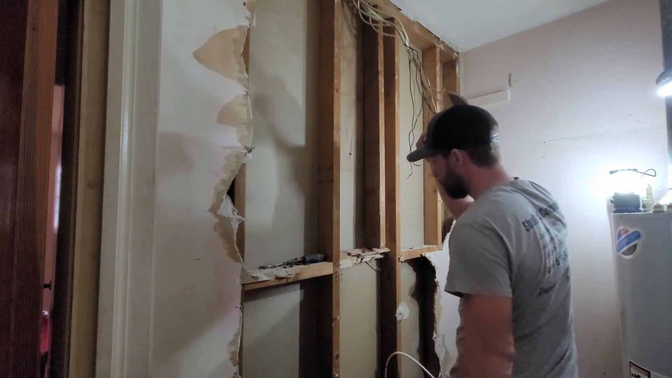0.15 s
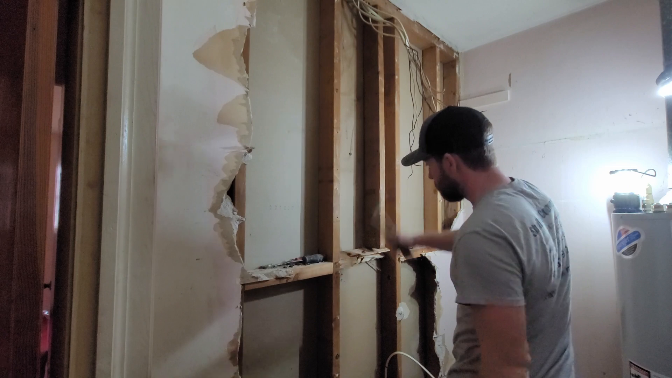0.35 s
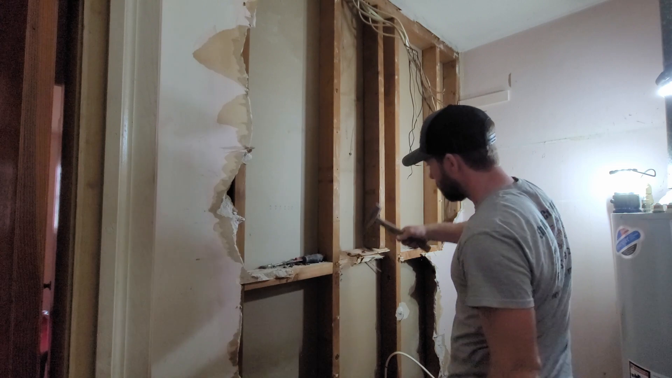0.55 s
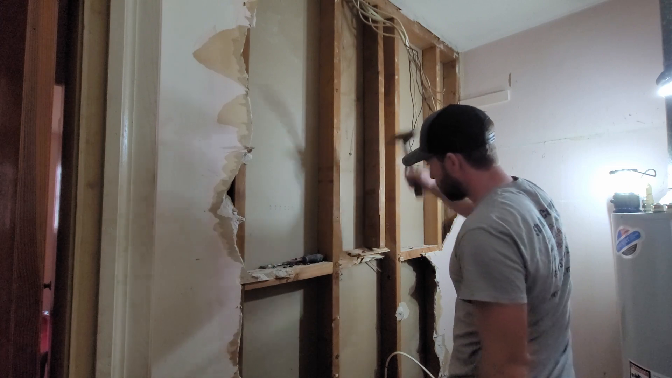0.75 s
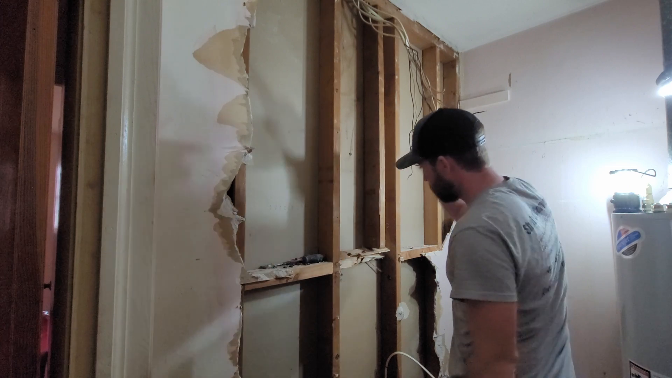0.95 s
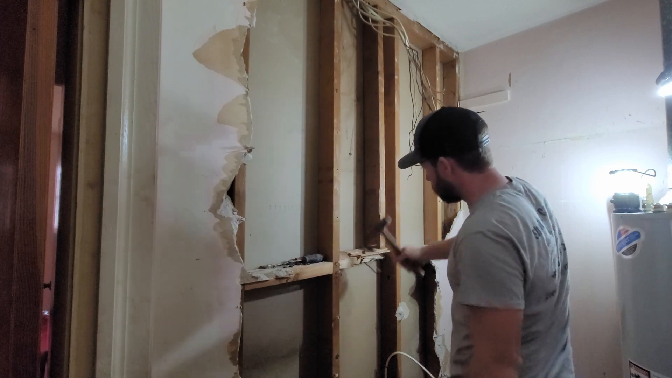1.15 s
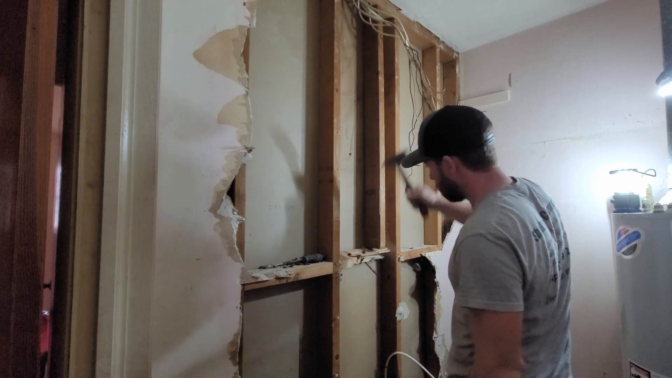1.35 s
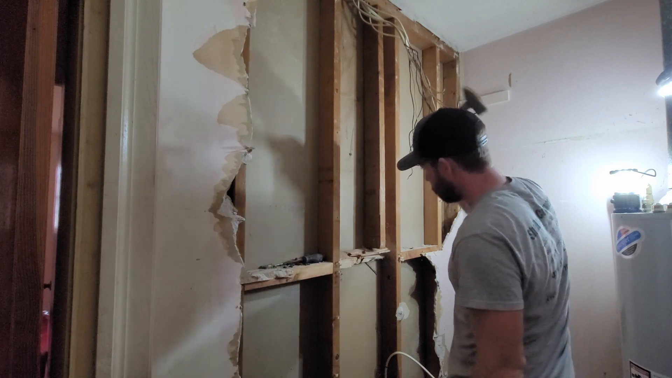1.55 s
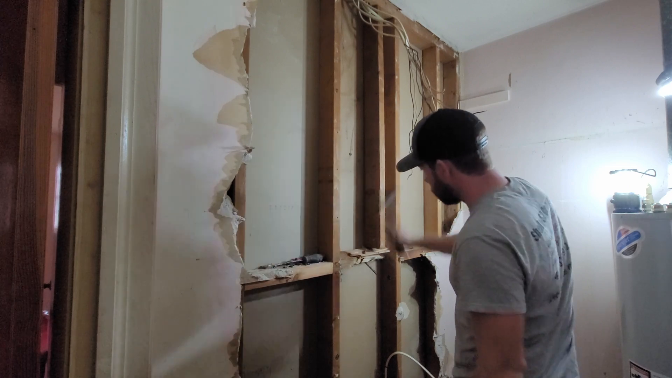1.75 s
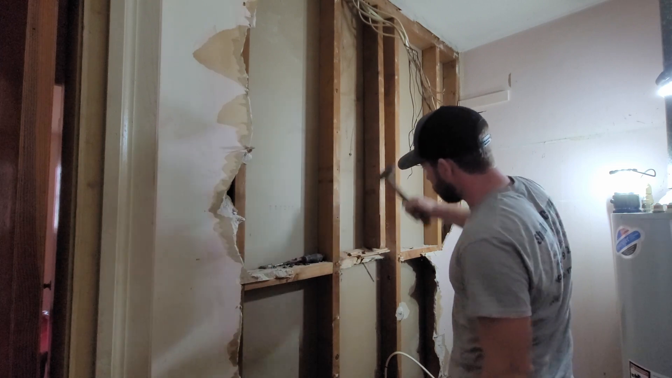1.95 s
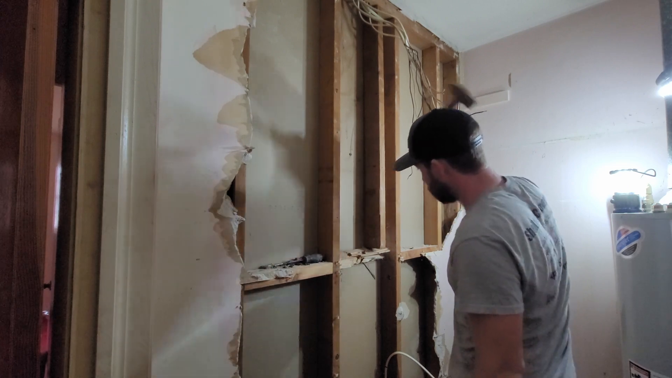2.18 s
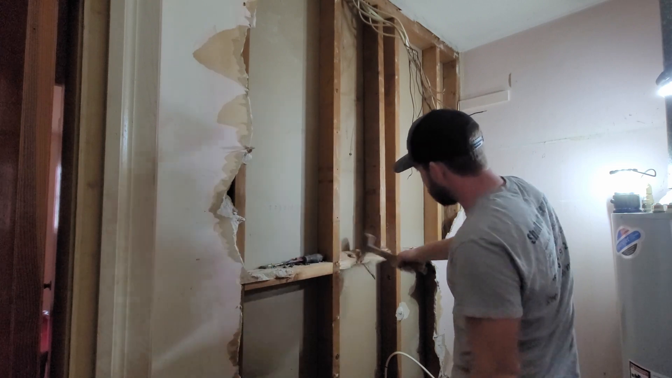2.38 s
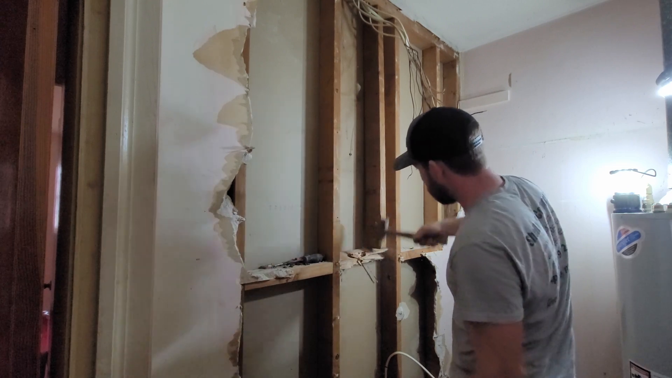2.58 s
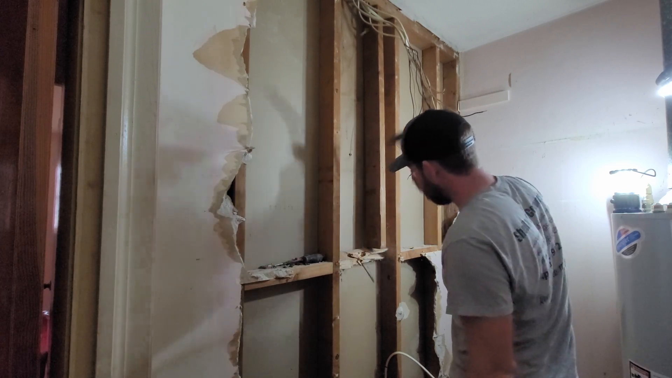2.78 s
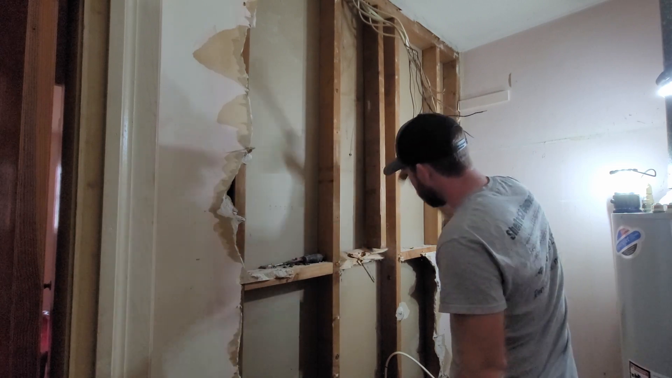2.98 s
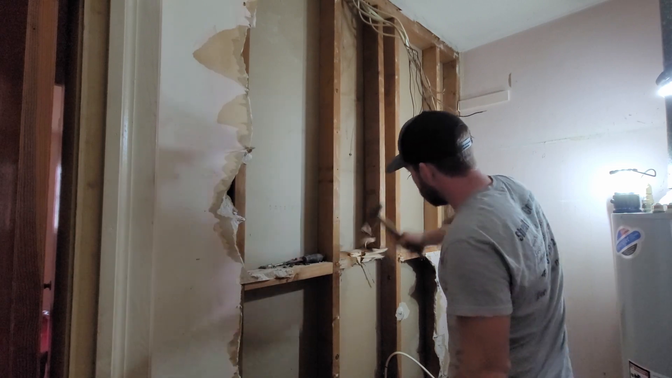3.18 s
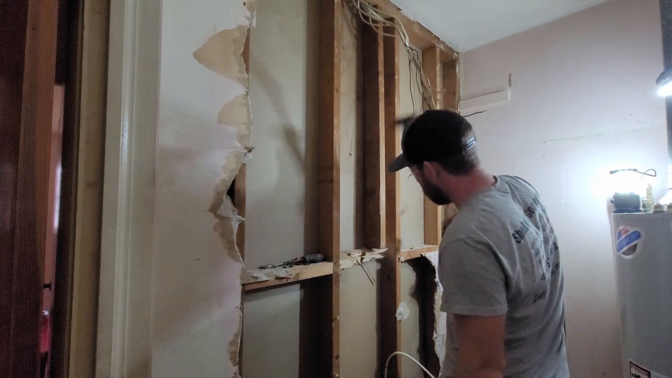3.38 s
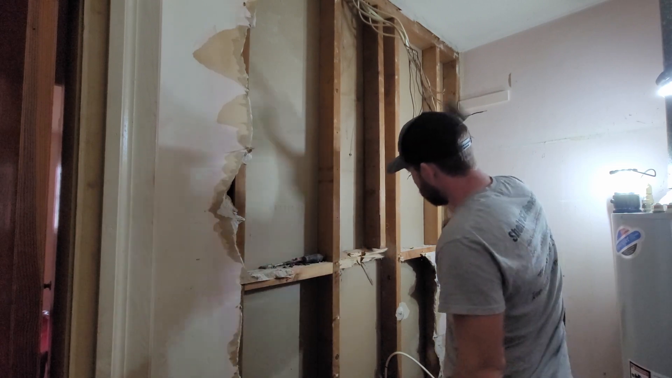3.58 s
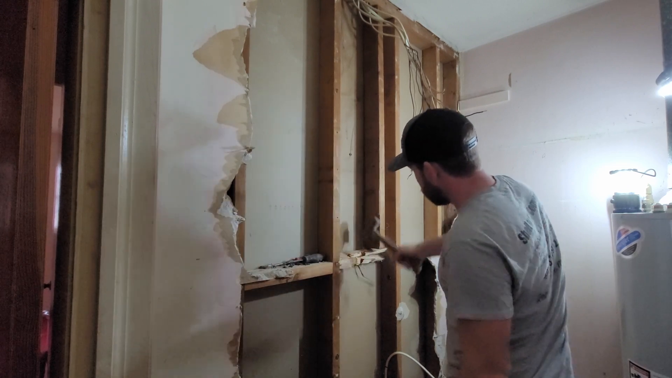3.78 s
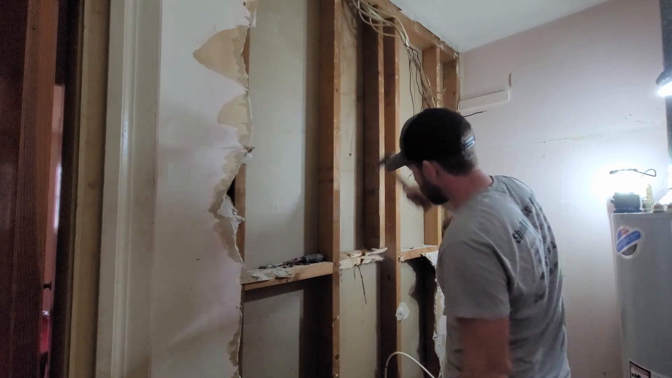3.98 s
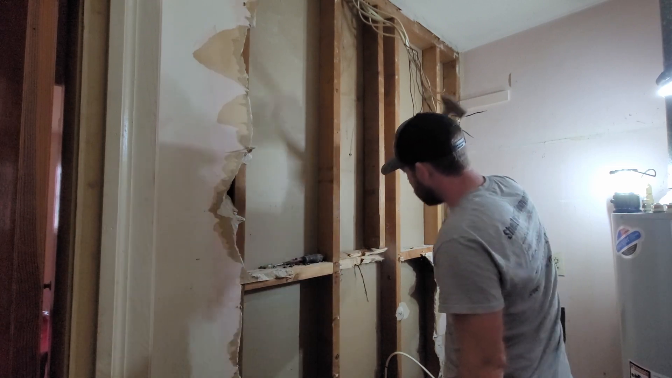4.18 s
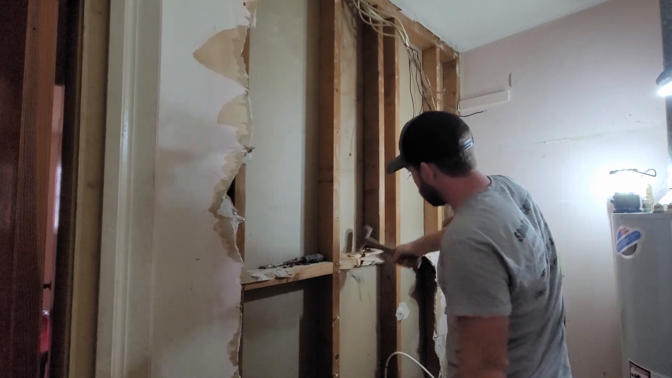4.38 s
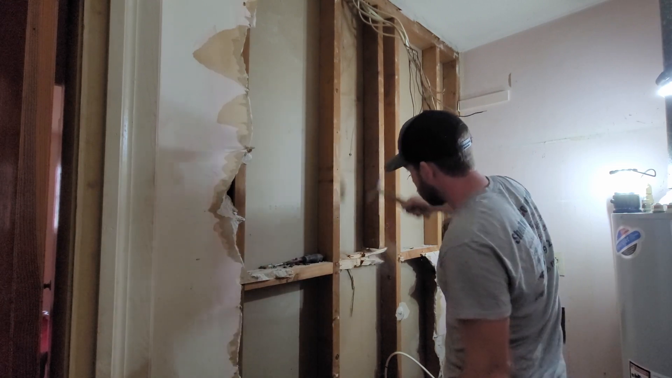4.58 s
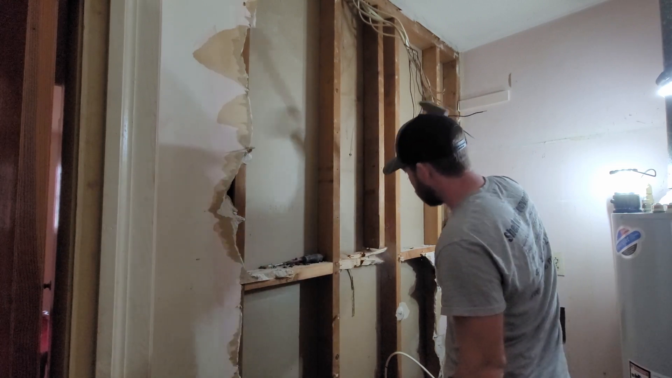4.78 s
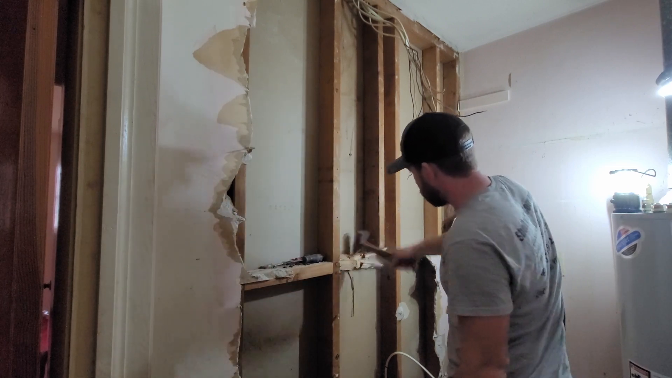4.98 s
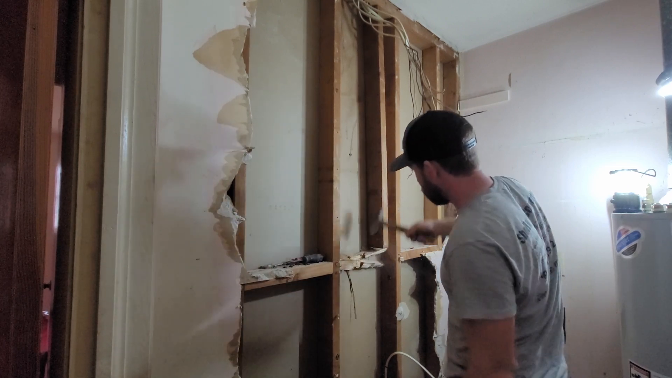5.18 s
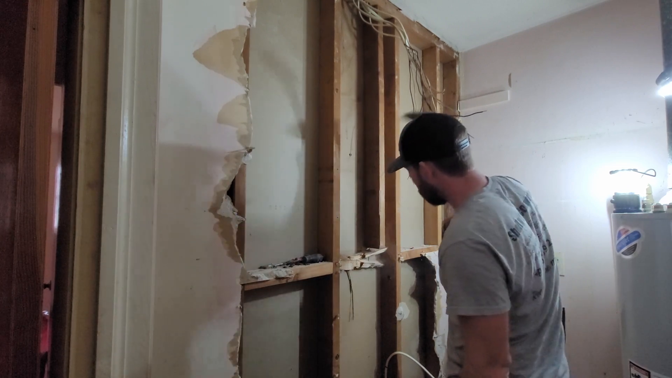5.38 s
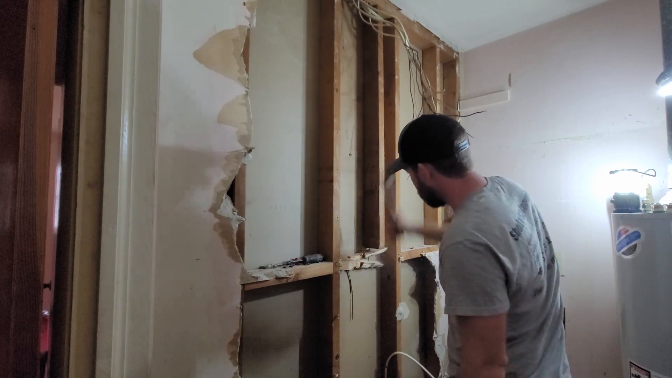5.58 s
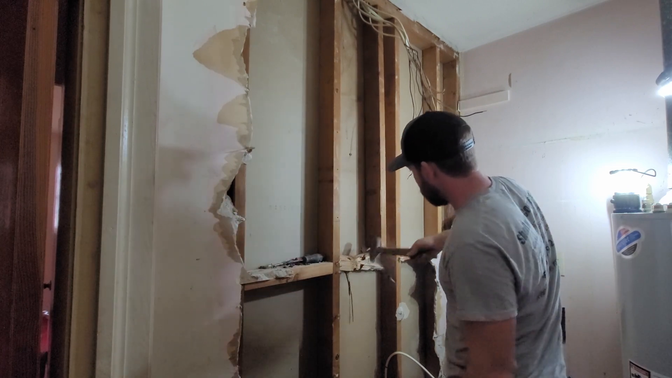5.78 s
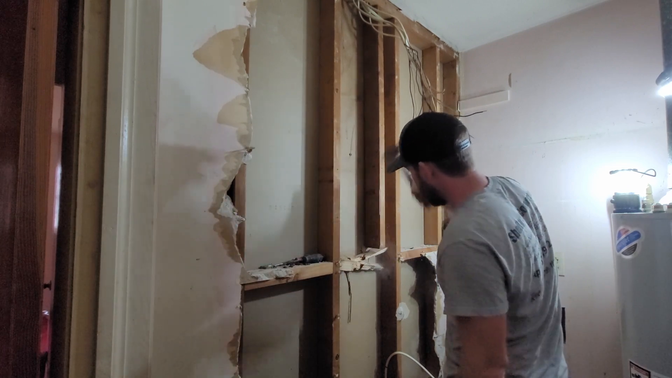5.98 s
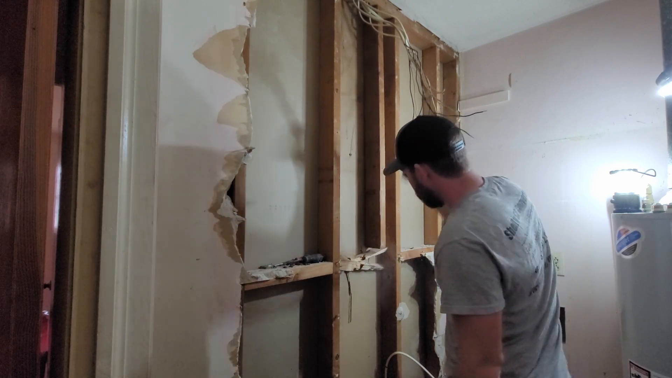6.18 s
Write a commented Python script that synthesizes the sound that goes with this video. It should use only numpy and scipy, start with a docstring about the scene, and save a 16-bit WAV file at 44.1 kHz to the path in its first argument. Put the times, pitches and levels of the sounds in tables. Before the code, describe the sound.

Loud, regular hammer blows land on timber wall framing a few metres from the microphone in an empty room. All nine strikes crack hard, slightly overloaded, each ringing a little differently and leaving a short echo through the house. Around the middle, loose pieces of wood and plaster tick and clack on the floor and a nail bounces. Only a faint rumble and hiss lie underneath.

```python
"""Hammering in a stud wall

A steel hammer strikes a timber cross-piece in an opened wall, a few metres away in a bare room.
Each blow cracks, excites the modes of timber and wall panels, and reverberates through the empty house.
Chips tick on the floor and a nail bounces, over faint rumble and hiss. The blows overload the
microphone input, which flattens the wave ahead of a bass cut and a limiter."""
import sys
import numpy as np
from scipy import signal
from scipy.fft import rfft, irfft
from scipy.io import wavfile
from scipy.ndimage import uniform_filter1d, minimum_filter1d

SR = 44100
rng = np.random.default_rng(int(sys.argv[2]) if len(sys.argv) > 2 else 0)


def wav_record(signal):
    """Record a signal, one row per channel, as 16-bit PCM in the file named by sys.argv[1]."""
    frames = np.transpose(np.atleast_2d(signal))
    bounded = np.clip(frames, -1, 1)
    # unit amplitude maps onto the largest positive 16-bit level
    quanta = np.round(bounded * 32767).astype(np.int16)
    wavfile.write(sys.argv[1], SR, quanta)


N = 275625


def undb(db):
    """Amplitude ratio of a level in decibels."""
    return 10 ** (np.asarray(db) / 20)


def fade(t, t60):
    """Exponential decay, 60 dB down at t60."""
    return np.exp(-np.log(1000) * t / max(t60, 1e-3))


def unit(x):
    """Normalisation to unit energy."""
    return x / np.sqrt(np.sum(x ** 2))


def add(out, start_s, x):
    """Superposition: x joins out from start_s on."""
    i = int(start_s * SR)
    out[i:i + len(x)] += x[:len(out) - i]


def bin_hz(size):
    """FFT bin frequencies, raised 1 Hz to keep their logarithm finite."""
    return np.fft.rfftfreq(size, 1 / SR) + 1


def bell(size, centre_hz, octaves):
    """Gaussian passband in log frequency, as gains on the FFT bins."""
    return np.exp(-.5 * (np.log2(bin_hz(size) / centre_hz) / octaves) ** 2)


def shape(table, size):
    """Spectral envelope: bin gains interpolated from (frequency [Hz], level [dB])."""
    hz, db = np.transpose(table)
    return undb(np.interp(np.log(bin_hz(size)), np.log(hz), db))


def minimum_phase(gain):
    """Folding the cepstrum gives the most compact causal pulse with this magnitude spectrum."""
    cepstrum = irfft(np.log(gain))
    half = len(cepstrum) // 2
    cepstrum[1:half] *= 2
    cepstrum[half + 1:] = 0
    return irfft(np.exp(rfft(cepstrum)))


def ring(modes, seconds, scatter_db, tilt_db=0):
    """Free vibration: damped modes of alternating sign, excited a little differently by each strike."""
    t = np.arange(int(seconds * SR)) / SR
    out = 0
    for k, (hz, db, t60) in enumerate(modes):
        level_db = db + scatter_db * rng.standard_normal() + tilt_db * np.log2(hz / modes[0][0])
        out += (-1) ** k * undb(level_db) * fade(t, t60) * np.sin(2 * np.pi * hz * t)
    return out


def room_responses(count):
    """Coupled spaces: after the direct sound, reverberation dies fast in the room, slowly in the house."""
    # reverberation: (frequency [Hz], room t60 [s], house level [dB], house t60 [s])
    reverberation = [(39, 0.39, -4.5, 3.9), (107.8, 0.21, -22, 1.06), (267, 0.41, -21.5, 1.246),
                     (550, 0.27, -26, 1.21), (1500, 0.25, -24, 1.135), (2500, 0.19, -24, 0.83),
                     (4460, 0.25, -24, 0.86), (6950, 0.19, -22, 0.57), (10200, 0.15, -20.5, .4),
                     (16300, 0.1, -23.5, .25)]
    size, rise_cycles, direct_db = 2 ** 16, 2.2, -12
    t = np.arange(size) / SR
    hz, *columns = np.transpose(reverberation)
    white = rfft(rng.standard_normal((count, size)))
    out = 0
    for centre in 32 * 2 ** (np.arange(28) / 3):  # third-octave bands
        room_t60, house_db, house_t60 = (np.interp(np.log(centre), np.log(hz), c) for c in columns)
        rise = 1 - np.exp(-t * centre / rise_cycles)  # low tones need longer to fill the room
        decay = fade(t, room_t60) + undb(house_db) * fade(t, house_t60)
        out += irfft(white * bell(size, centre, 1 / 7), size) * rise * decay
    out /= np.sqrt(np.sum(out ** 2, axis=1, keepdims=True))
    out[:, 0] += undb(direct_db)
    return out


def still_house():
    """Stationary noise: a faint rumble and hiss."""
    # background spectrum: (frequency [Hz], relative spectral density [dB])
    spectrum = [(18, -43), (30, -1.5), (69, 12.5), (163, -12), (579, -31.5), (1180, -32.5), (4840, -24.5),
                (6760, -32.5), (9000, -42), (11700, -61), (19800, -120)]
    rms_db = -59.5
    noise = irfft(rfft(rng.standard_normal(N)) * shape(spectrum, N), N)
    return undb(rms_db) * noise / np.std(noise)


def tick(db, centre_hz, octaves):
    """A brief impact gives a pulse with one spectral peak on a fainter, broad skirt."""
    peak = bell(1024, centre_hz, octaves)
    skirt = undb(-24) * bell(1024, centre_hz, octaves=1.4)
    return undb(db) * unit(minimum_phase(peak + skirt + 1e-3))


def debris(response):
    """Impacts on the floor: chips tick, a nail ticks and rings; reflections smear both."""
    # falling wood and plaster: (time [s], level [dB], centre [Hz], width [octaves])
    chips = [(0.341, -42.5, 640, 0.35), (.798, -39, 8800, 0.43), (2.725, -36, 13100, .3),
             (2.79, -35, 11000, .15), (2.816, -6.5, 3900, 0.24), (2.875, -32, 7340, 0.41),
             (3.068, -4.5, 1570, 0.87), (3.143, -40, 10000, 0.56), (4.047, -29, 11500, 0.3),
             (4.157, -42, 12000, .3), (4.185, -42, 12500, .3), (4.242, -3.5, 3600, 0.69),
             (4.399, -41, 9800, 0.31)]
    # a pulled nail bouncing: (time [s], ring level [dB], tilt [dB/octave], tick level [dB], tick [Hz])
    bounces = [(2.979, -49, 9, -25, 7500), (3.167, -16.5, -15.5, -16, 4200)]
    # modes of the nail: (frequency [Hz], level [dB], t60 [s])
    nail_modes = [(2062, -12, .025), (2546, -13, .02), (4750, 1, .01), (6700, -5, .01), (8500, 0, .01),
                  (11400, -9, .01), (14800, -18, .006)]
    echo_t60_s, reverb_db = .1, 7
    impacts = np.zeros(N)
    for start_s, db, hz, octaves in chips:
        add(impacts, start_s, tick(db, hz, octaves))
    for start_s, db, tilt_db, tick_db, tick_hz in bounces:
        add(impacts, start_s, undb(db) * ring(nail_modes, seconds=.25, scatter_db=1, tilt_db=tilt_db))
        add(impacts, start_s, tick(tick_db, tick_hz, octaves=.52))
    t = np.arange(4096) / SR
    echoes = unit(rng.standard_normal(len(t)) * fade(t, echo_t60_s))  # off the floor and open studs
    early = signal.fftconvolve(impacts, echoes)[:N]
    reverberant = signal.fftconvolve(impacts, response)[:N]
    return early + undb(reverb_db) * reverberant


def wall_thump(db):
    """Rarefaction: the whole wall lurches away and pulls the air with it."""
    hz, t60_s = 21.56, .1
    return -ring([(hz, db, t60_s)], seconds=.3, scatter_db=4)


def wall_boom(db):
    """Low modes swell as the bending wave spreads through the panels."""
    # modes of the wall panels and room air: (frequency [Hz], level [dB], t60 [s])
    wall_modes = [(43.82, -17.5, 3.1), (53.97, -20, 1.3), (52.56, 10.5, 0.36), (63.26, -8, 0.74),
                  (73.73, 8.5, .3), (105.3, 3, 0.38), (124.1, 6, 0.37), (163.2, 2.5, 0.27),
                  (208.7, -6, 0.44), (278, -12.5, 0.54), (416.2, -10, 0.4), (604.5, -10.5, 0.23),
                  (760.5, 3.5, 0.091)]
    rise_s = .029
    boom = ring(wall_modes, seconds=1.5, scatter_db=4)
    swell = 1 - np.exp(-np.arange(len(boom)) / SR / rise_s)
    return undb(db) * swell * boom


def timber_knock(size, tilt, spot_hz, lift_db):
    """The striking point selects the resonances: those near spot_hz and its octave ring most."""
    # spectrum of a blow: (frequency [Hz], relative spectral density [dB])
    spectrum = [(40, -13), (100, 4.5), (250, -1.5), (600, 2), (1300, -7), (2500, -6.5), (4500, -15),
                (6500, -21), (10000, -25), (13000, -27), (16000, -32)]
    # resonances of the timber: (frequency [Hz])
    timber_hz = [450, 680, 1090, 2100, 3100, 4250, 5200, 8400]
    reach_octaves, overtone_share = .37, .52
    resonances = sum(bell(size, hz, octaves=.12) for hz in timber_hz)
    excited = bell(size, spot_hz, reach_octaves) + overtone_share * bell(size, 2 * spot_hz, reach_octaves)
    return minimum_phase(shape(spectrum, size) * tilt * undb(lift_db * resonances * excited))


def crack(size, tilt):
    """Contact noise of the steel face on wood fibres, heard before the room fills."""
    band = tilt * bell(size, centre_hz=3100, octaves=.54)
    noise = irfft(rfft(rng.standard_normal(size)) * band)
    return noise * fade(np.arange(size) / SR, t60=.055)


def hammer(responses):
    """Impulsive excitation: each blow drives timber and wall, and sounds the room from its own spot."""
    # blows: (time [s], strength [dB], relative boom level [dB], tilt [dB/octave],
    #         strongest ringing near [Hz], lift of that ringing [dB])
    blows = [(0.487, 46.5, -44, 0.95, 1090, 2), (1.212, 47, -44, -0.12, 4700, 6),
             (1.893, 47, -45, -1.05, 480, 2), (2.522, 46.5, -43, -0.17, 1090, 4),
             (3.256, 44.5, -43, 0.34, 3800, 2.5), (3.869, 48, -49, 0.14, 650, 1.5),
             (4.494, 46, -49.5, 0.53, 4300, 4.5), (5.118, 45.5, -49, 0.28, 4200, 9),
             (5.775, 46.5, -50, 0.9, 5200, 4.5)]
    pivot_hz, tilt_top_hz = 1500, 5300
    crack_db, thump_db, thump_lag_s = -32.5, -30, .008
    size = 4096
    octaves_from_pivot = np.log2(np.minimum(bin_hz(size), tilt_top_hz) / pivot_hz)
    out = np.zeros(N)
    for (start_s, db, boom_db, tilt_db, spot_hz, lift_db), response in zip(blows, responses):
        tilt = undb(tilt_db * octaves_from_pivot)
        knock = timber_knock(size, tilt, spot_hz, lift_db)
        add(out, start_s, undb(db) * signal.fftconvolve(knock, response))
        add(out, start_s, undb(db + crack_db) * crack(size, tilt))
        add(out, start_s + thump_lag_s, wall_thump(db + thump_db))
        add(out, start_s, wall_boom(db + boom_db))
    return out


def scene():
    """The pressures of all sources add at one point in the room."""
    *blow_responses, floor_response = room_responses(count=10)  # nine blows and the floor
    return (hammer(blow_responses) + debris(floor_response) + still_house())[None]


def record(dry):
    """Saturation flattens the peaks; a bass cut, a limiter and a treble cut follow."""
    clip_level, knee = 3.35, 2.5
    bass_cut_hz, top_hz, limiter_s = 210, 16200, .01
    flat = dry / (1 + np.abs(dry / clip_level) ** knee) ** (1 / knee)
    highpass = signal.butter(1, bass_cut_hz, "highpass", fs=SR, output="sos")
    sagging = signal.sosfilt(highpass, flat)  # the flat tops sag toward zero
    # the limiter looks ahead: its gain ramps down to meet each peak and comes straight back
    window = int(limiter_s * SR)
    allowed_gain = 1 / np.maximum(np.abs(sagging), 1)
    gain = uniform_filter1d(minimum_filter1d(allowed_gain, window), window)
    lowpass = signal.ellip(8, .2, 70, top_hz, fs=SR, output="sos")
    return np.clip(signal.sosfilt(lowpass, sagging * gain), -1, 1)


dry = scene()
out = record(dry)
wav_record(out)
```